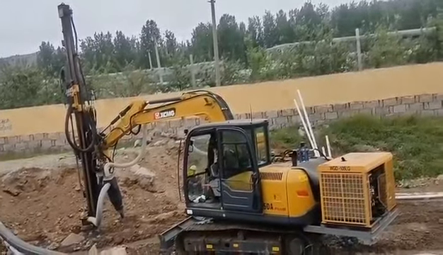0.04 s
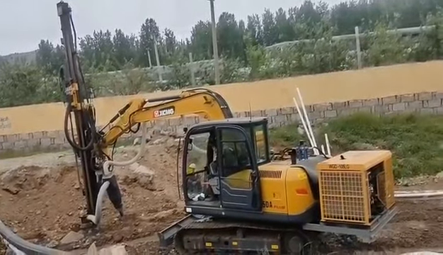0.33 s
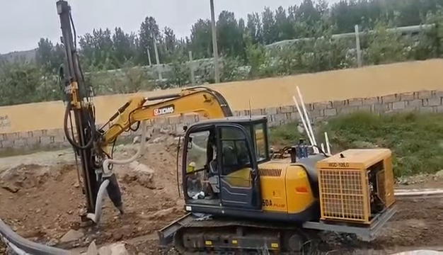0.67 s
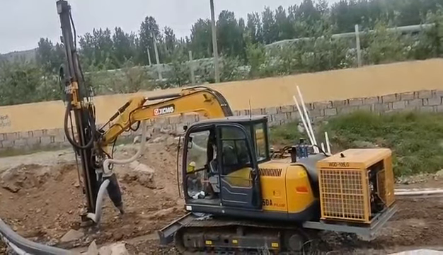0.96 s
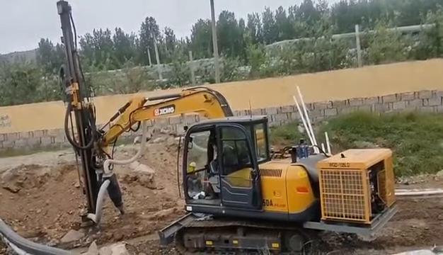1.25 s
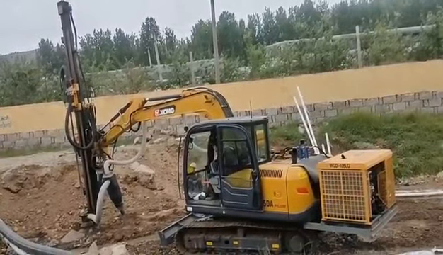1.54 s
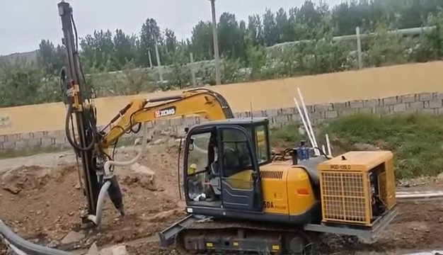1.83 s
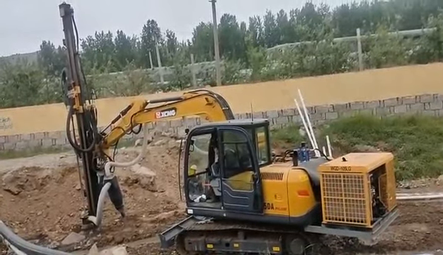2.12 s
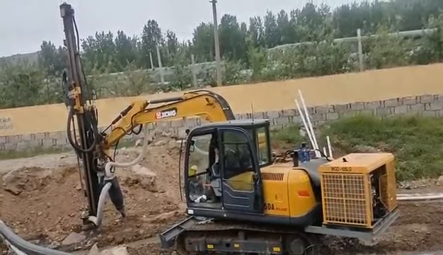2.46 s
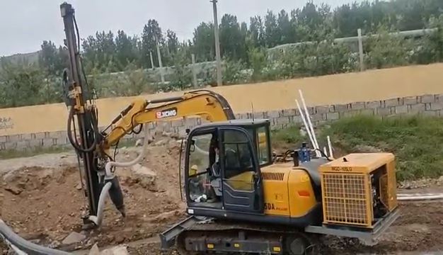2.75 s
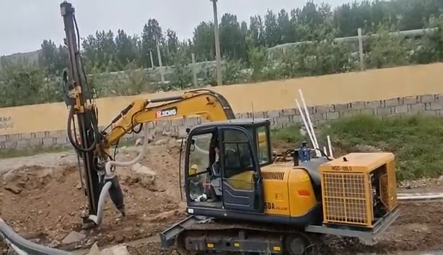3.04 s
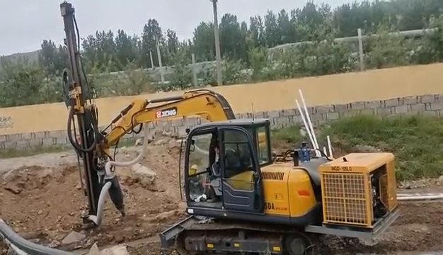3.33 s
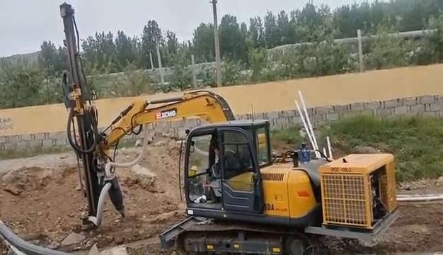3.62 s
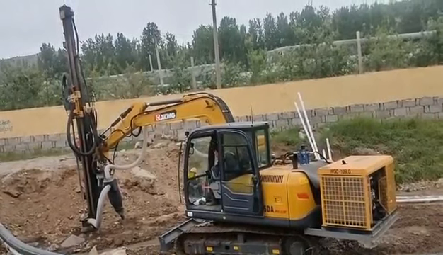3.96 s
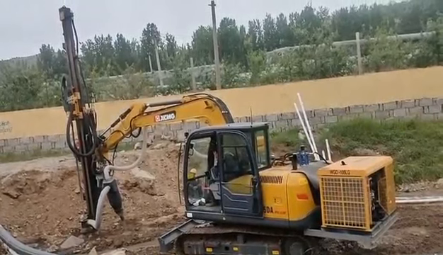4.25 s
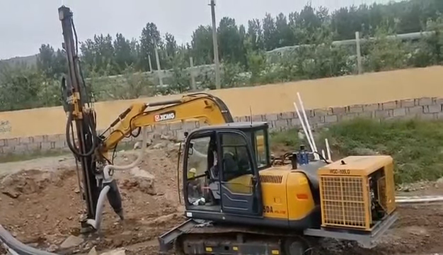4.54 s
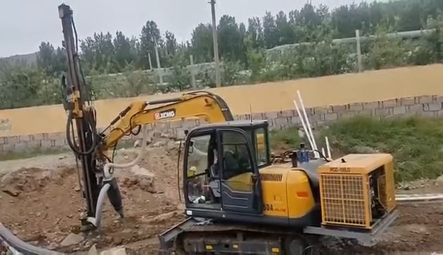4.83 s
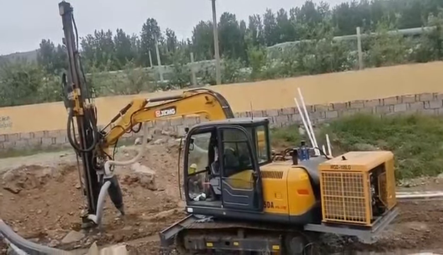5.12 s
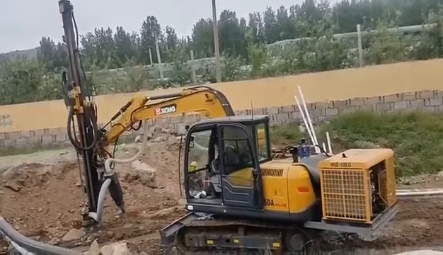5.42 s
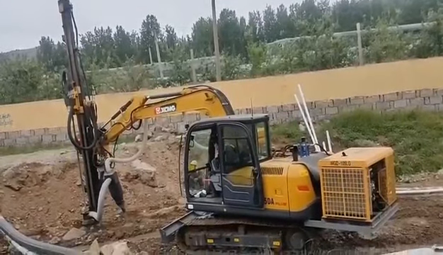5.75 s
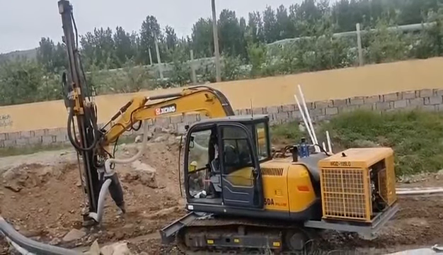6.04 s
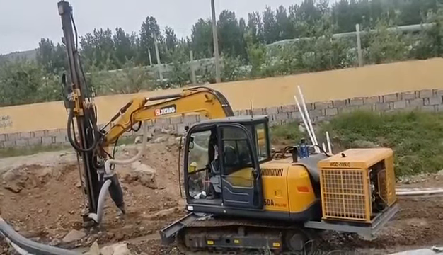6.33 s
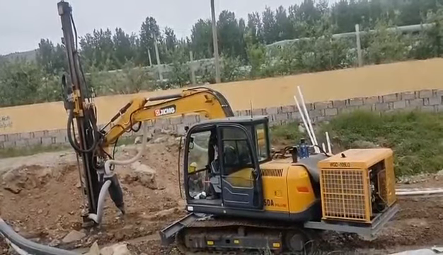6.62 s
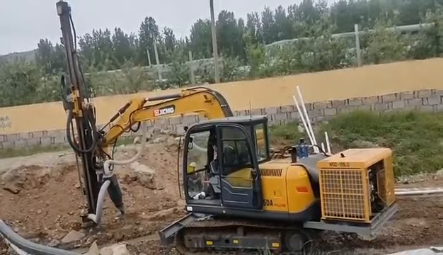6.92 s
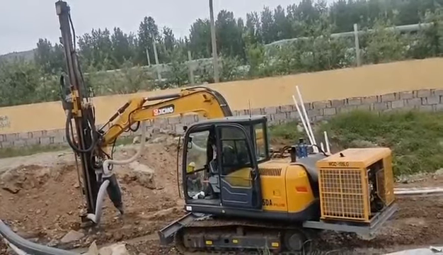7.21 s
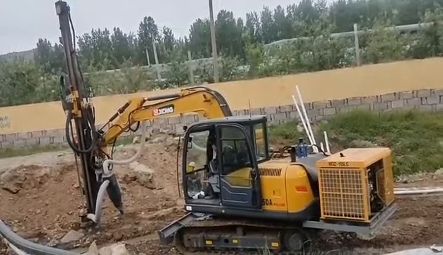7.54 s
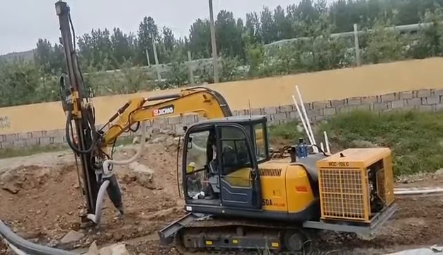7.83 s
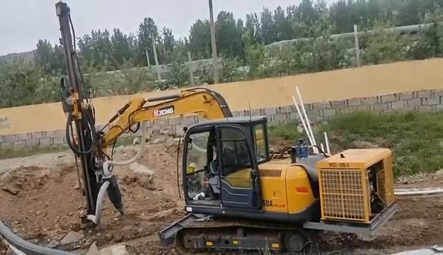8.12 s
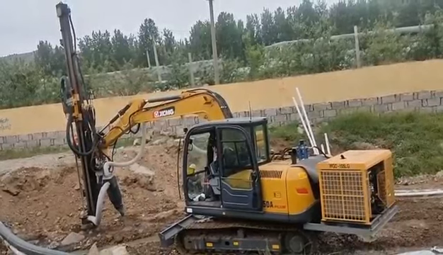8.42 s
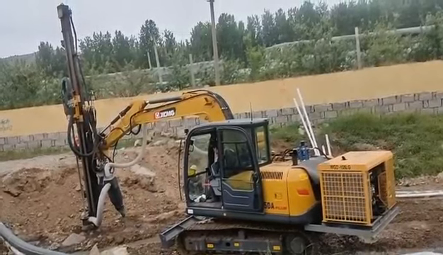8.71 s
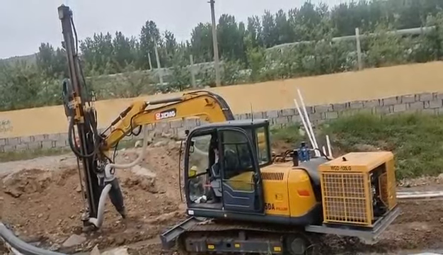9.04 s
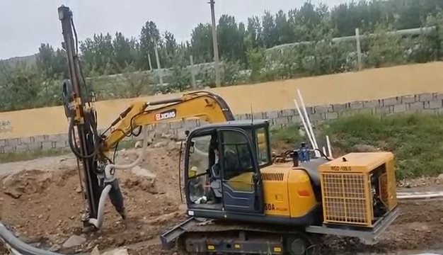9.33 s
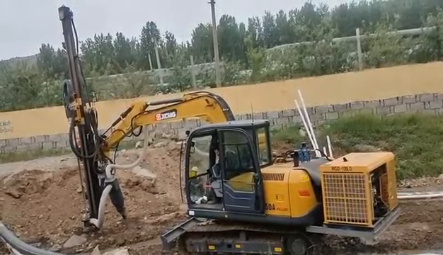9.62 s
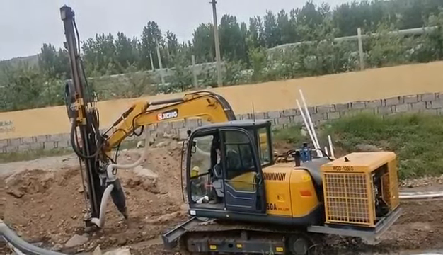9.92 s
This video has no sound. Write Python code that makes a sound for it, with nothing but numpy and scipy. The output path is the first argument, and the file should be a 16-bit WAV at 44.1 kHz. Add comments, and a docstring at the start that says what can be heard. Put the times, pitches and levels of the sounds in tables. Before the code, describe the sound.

A rock drill hammers rapidly with ringing steel and hissing air over the steady drone of a diesel engine.

```python
"""Open worksite: an excavator-mounted rock drill bores into stony ground. The hammer strikes about 26 times a
second, ringing the drill steel and rattling chuck and mast; flushing air hisses at the hole. A four-cylinder
diesel drives the compressor under load, with fan whine and buzzing covers; a second engine idles beside it, its
hydraulic pump whining at a steady pitch. Loose stones rasp under the bit, the steel sings in soft patches, and
the bit bites hard on solid rock."""
import sys
import numpy as np
from scipy import signal
from scipy.fft import rfft, irfft, next_fast_len
from scipy.io import wavfile
from scipy.ndimage import uniform_filter1d

SR = 44100
rng = np.random.default_rng(int(sys.argv[2]) if len(sys.argv) > 2 else 0)


def master_out(mix):
    """Clip the mix to full scale and print it as 16-bit PCM to the path in sys.argv[1]."""
    frames = np.transpose(np.atleast_2d(mix))
    ceiling = np.clip(frames, -1, 1)
    pcm = np.round(ceiling * 32767).astype(np.int16)
    wavfile.write(sys.argv[1], SR, pcm)


N = 439677
TIME_S = np.arange(N) / SR


def from_db(db):
    """Decibels to gain."""
    return 10 ** (np.asarray(db) / 20)


def unit_rms(x):
    """Scale to rms 1."""
    return x / np.sqrt(np.mean(x ** 2) + 1e-20)


def curves(rows):
    """Columns after time_s, interpolated to every sample."""
    time_s, *columns = np.transpose(rows)
    return [np.interp(TIME_S, time_s, column) for column in columns]


def drift(rate_hz):
    """Random wander through unit-normal points."""
    return np.interp(TIME_S * rate_hz, np.arange(4000), rng.standard_normal(4000))


def swell(centre_s, sigma_s):
    """Gaussian rise and fall, height 1."""
    return np.exp(-.5 * ((TIME_S - centre_s) / sigma_s) ** 2)


def coloured(x, spectrum):
    """Filter by a smooth spectrum; rms 1."""
    freq_hz, density_db = np.transpose(spectrum)
    size = next_fast_len(N + SR // 10)
    grid_hz = np.maximum(np.arange(size // 2 + 1) * SR / size, 1)
    gain = from_db(np.interp(np.log(grid_hz), np.log(freq_hz), density_db))
    return unit_rms(irfft(rfft(x, size) * gain, size)[:N])


def resonance(x, freq_hz, width_hz):
    """Two-pole resonator, peak gain 1."""
    radius = np.exp(-np.pi * width_hz / SR)
    feedback = [1, -2 * radius * np.cos(2 * np.pi * freq_hz / SR), radius ** 2]
    return signal.lfilter(np.array([1, 0, -1]) * (1 - radius ** 2) / 2, feedback, x + 1e-18)


def band(x, freq_hz, width_hz):
    """Two resonators in series; rms 1."""
    return unit_rms(resonance(resonance(x, freq_hz, width_hz), freq_hz, width_hz))


# Tight patches: centre_s, sigma_s, lost_hz
BINDS = [(6.62, .06, 1.44), (7.2, .1, 1.12)]

def binding_hz():
    """Blow rate lost while the rod binds."""
    return sum(lost_hz * swell(centre_s, sigma_s) for centre_s, sigma_s, lost_hz in BINDS)


# Hammer pace in even rock: time_s, rate_hz
HAMMER_PACE = [(0, 26.259), (2.2, 26.105), (3.6, 25.898), (6.2, 26.164), (7.6, 25.996), (10, 26.118)]
# Soft patches, rod running free: centre_s, sigma_s, extra_hz, singing_db
SOFT_PATCHES = [(1.3, .1, 1.02, -32), (1.94, .05, .5, -31), (2.7, .07, .79, -32.5), (5.55, .07, .09, -33),
                (8.97, .08, 1.09, -32), (9.77, .08, .82, -37)]

def blow_count():
    """Blows so far; the hammer hurries in soft patches and labours in tight ones."""
    hurry_hz = sum(extra_hz * swell(centre_s, sigma_s) for centre_s, sigma_s, extra_hz, _ in SOFT_PATCHES)
    return np.cumsum(curves(HAMMER_PACE)[0] + hurry_hz - binding_hz()) / SR


def chatter(jitter_s, uneven_db, rise_s, hold_s, fall_s, memory):
    """Each piston blow starts a burst of chatter that partly repeats the one before."""
    blows, lead_blows = blow_count(), .16
    starts_s = np.interp(np.arange(int(blows[-1]) + 1) - lead_blows, blows, TIME_S, right=TIME_S[-1])
    age_s = np.arange(SR // 14) / SR
    envelope = np.minimum(age_s / rise_s, 1) * np.exp(-np.maximum(age_s - hold_s, 0) / fall_s)
    pattern = rng.standard_normal(len(age_s))
    out = np.zeros(N + SR)
    for start_s in starts_s:
        late, force = rng.standard_normal(2)
        pattern = memory * pattern + np.sqrt(1 - memory ** 2) * rng.standard_normal(len(age_s))
        at = max(int((start_s + jitter_s * late) * SR), 0)
        out[at:at + len(age_s)] += from_db(uneven_db * force) * envelope * pattern
    return unit_rms(out[:N])


def evened(x):
    """The piston delivers nearly equal energy over every three blows."""
    return x / np.sqrt(uniform_filter1d(x ** 2, size=5088) + 1e-12)


# Course of the drilling: time_s, steel_db, air_db
DRILLING_LEVELS = [(0, -29.5, -33), (1, -29.5, -33.5), (2.3, -31.5, -34.5), (3.6, -32, -32),
                   (5, -30.5, -34.5), (6.3, -32, -36), (8, -30.5, -36.5), (9, -31, -35.5),
                   (10, -31.5, -33.5)]
# Drill steel modes: pitch_hz, width_hz, level_db, sink_change_db
STEEL_MODES = [(1608, 67, -14.5, 2.5), (2657, 50, -13, -7.5), (3634, 39, -5.5, 3), (4030, 58, -11, 2.5),
               (4340, 82, -17.5, 3), (5145, 45, 0, -6), (5330, 250, -5, -8.5), (5470, 55, -1, -6.5),
               (5647, 100, -2, 3), (5752, 45, 2.5, 2), (6000, 45, 0.5, -3), (6230, 32, 1.5, -1.5),
               (6570, 50, -7.5, 1), (6778, 35, -1.5, -4), (7370, 34, -1.5, -2)]
# Loose chuck and mast: freq_hz, density_db
RATTLE_SPECTRUM = [(700, -27.5), (1400, -3), (2100, -4.5), (3000, -2), (4700, -6.5), (5500, -4), (6500, -6),
                   (7500, -2.5), (8000, -10)]

def drill(ring_gain_db, rattle_db, turning_db):
    """Blows rattle the mast and ring the steel, whose modes trade strength as it turns and sinks."""
    rock_rate_hz, rock_swing_db, bind_db_per_hz = 7, 0.5, 0.5
    steel_db = curves(DRILLING_LEVELS)[0] + rock_swing_db * drift(rock_rate_hz)
    steel_db += ring_gain_db - bind_db_per_hz * binding_hz()
    mast_db = rattle_db + rock_swing_db * drift(rock_rate_hz)
    chuck = chatter(jitter_s=.0001, uneven_db=.04, rise_s=.0035, hold_s=.0089, fall_s=.01, memory=.51)
    mast = chatter(jitter_s=.0005, uneven_db=3.5, rise_s=.0047, hold_s=.0062, fall_s=.031, memory=.13)
    depth = TIME_S / TIME_S[-1] - .5
    delays = rng.integers(0, SR // 600, len(STEEL_MODES))  # wave travel along the rod
    ring = 0
    for delay, (pitch_hz, width_hz, level_db, sink_change_db) in zip(delays, STEEL_MODES):
        gain = from_db(level_db + sink_change_db * depth + turning_db * drift(6))
        ring += gain * resonance(np.roll(chuck, delay), pitch_hz, width_hz)
    return from_db(steel_db) * evened(ring) + from_db(mast_db) * coloured(mast, RATTLE_SPECTRUM)


# Air hiss: freq_hz, density_db
AIR_SPECTRUM = [(1500, -13), (2300, -9), (3100, -2.5), (4700, 2.5), (5700, 12.5), (6500, 4.5), (7600, 4.5),
                (8000, -14.5)]
# Dust hose and hood: pitch_hz, width_hz, gain_db
HOSE_MODES = [(3175, 120, 2.5), (3840, 64, 5), (4270, 92, 3), (7110, 130, 4)]

def flushing_air(gain_db, flutter_db, surge_db, puff_db):
    """Air carries grit out through the dust hose, with a puff of chips after each blow."""
    flow_db = curves(DRILLING_LEVELS)[1] + surge_db * drift(5)
    flow_db += puff_db * np.cos(2 * np.pi * (blow_count() - .1))
    hiss = coloured(grains(rate_hz=12000, spread_db=5.0), AIR_SPECTRUM)
    hose = sum(from_db(db) * resonance(hiss, pitch_hz, width_hz) for pitch_hz, width_hz, db in HOSE_MODES)
    return from_db(flow_db + gain_db + flutter_db * drift(20)) * unit_rms(hiss + hose)


def grains(rate_hz, spread_db):
    """Tiny random contacts of uneven size; rms 1."""
    sizes = from_db(spread_db * np.minimum(rng.exponential(1, N), 4)) * rng.choice([-1, 1], N)
    return unit_rms(sizes * (rng.random(N) < rate_hz / SR))


# Compressor diesel, one slow governor surge: time_s, firing_hz
DIESEL_SPEED = [(0, 78.423), (0.5, 77.628), (1.6, 77.811), (2.7, 78.512), (3.5, 79.327), (4.6, 79.485),
                (6.5, 78.596), (7.7, 78.503), (8.9, 77.519), (10, 78.169)]

def firing_count():
    """Diesel firings so far."""
    return np.cumsum(curves(DIESEL_SPEED)[0]) / SR


def diesel(cruise_hz, casing_gain_db, boom_gain_db, boom_hz, boom_width_hz):
    """Exhaust note, knocking casing, and the silencer booming with uneven gas flow."""
    surge_hz = curves(DIESEL_SPEED)[0] - cruise_hz
    firings = firing_count() + .82
    boom = from_db(boom_gain_db) * band(rng.standard_normal(N), boom_hz, boom_width_hz)
    clatter = from_db(casing_gain_db) * casing(firings, knock_db=-2.0, repeat_db=-7.5, fall_cycles=0.49)
    body_db = -29 - 0.07 * TIME_S
    return exhaust(firings, surge_hz, waver_db=0.3) + from_db(body_db) * (clatter + boom)


# Exhaust partials: firing_order, level_db
EXHAUST_PARTIALS = [(1, 0), (1.25, -31.5), (1.75, -25), (2.5, -28), (2.749, -28.5), (3, -19), (3.5, -29.5),
                    (4, -31), (5, -33), (5.5, -28.5), (7, -26.5), (10, -29.5)]

def exhaust(firings, surge_hz, waver_db):
    """One pressure pulse per firing, louder and rounder as the diesel speeds up."""
    note_db = -16 + 1.0 * surge_hz
    second_db = -8.5 - 1.7 * surge_hz
    note = from_db(second_db) * np.cos(4 * np.pi * firings)
    for order, level_db in EXHAUST_PARTIALS:
        gain = from_db(level_db + waver_db * min(order - .75, 2) * drift(23))
        note += gain * np.cos(2 * np.pi * order * firings)
    return -from_db(note_db) * note


# Casing under combustion knock: freq_hz, density_db
CASING_SPECTRUM = [(150, -12), (280, -10.5), (340, -4.5), (400, -1.5), (480, 3.5), (600, 1.5), (690, -1),
                   (900, -8), (1170, -8.5), (1350, -13.5), (2050, -21.5), (3000, -20), (7000, -38.5)]

def casing(firings, knock_db, repeat_db, fall_cycles):
    """Each cylinder knocks with its own strength; part of the clatter repeats every four firings."""
    cylinder_db = np.array([-0.56, 0.19, -1.0, 1.4])
    knocks = firings + .4
    envelope = from_db(knock_db + cylinder_db[knocks.astype(int) % 4]) * np.exp(-(knocks % 1) / fall_cycles)
    period = int(4 * N / firings[-1])
    repeating = np.interp(firings / 4 % 1 * period, np.arange(period), rng.standard_normal(period))
    clatter = rng.standard_normal(N) + from_db(repeat_db) * repeating
    return coloured((1 + envelope) * clatter, CASING_SPECTRUM)


# Idle partials: firing_order, level_db
IDLE_PARTIALS = [(1, -38), (2, -36.5), (3, -47)]
# Ground-borne rumble: freq_hz, density_db
RUMBLE_SPECTRUM = [(12, -12.5), (25, -4), (50, 0), (100, 3), (140, 1.5), (190, -1.5), (300, -11.5),
                   (600, -35)]

def idling_engine(firing_hz, rumble_db, waver_db):
    """The excavator's own engine ticks over above a low rumble."""
    firings = firing_hz * TIME_S + 0.044 * drift(2.0)
    hum = sum(from_db(level_db + waver_db * drift(5.4)) * np.sin(2 * np.pi * order * firings)
              for order, level_db in IDLE_PARTIALS)
    return hum + from_db(rumble_db) * coloured(rng.standard_normal(N), RUMBLE_SPECTRUM)


# Cooling fan and compressor rotors: firing_order
ROTOR_ORDERS = [4.365, 8.73, 10.61, 13.09]
# Rotor tones: level_db
ROTOR_LEVELS_DB = [-48, -41.5, -53, -58.5]
# Hydraulic pump: pitch_hz, level_db
PUMP_TONES = [(481, -38.5), (841, -50), (1443, -56)]

def fan_and_pump(wander_cycles, waver_db):
    """Fan tones follow the diesel with slight belt slip; the pump holds its own pitch."""
    firings = firing_count()
    fan = [(order * firings, level_db) for order, level_db in zip(ROTOR_ORDERS, ROTOR_LEVELS_DB)]
    pump = [(pitch_hz * TIME_S, level_db) for pitch_hz, level_db in PUMP_TONES]
    out = 0
    for cycles, level_db in fan + pump:
        gain = from_db(level_db + waver_db * drift(5))
        out += gain * np.sin(2 * np.pi * (cycles + wander_cycles * drift(4)))
    return out


def covers(level_db, shake_db, centre_hz, width_hz, fall_cycles):
    """Loose sheet covers buzz unevenly with the firings."""
    age_cycles = (firing_count() + .9) % 1
    knocks = np.exp(-age_cycles / fall_cycles) * from_db(shake_db * np.tanh(drift(25)))
    return from_db(level_db) * band(knocks * rng.standard_normal(N), centre_hz, width_hz)


# Loose stones under the bit: centre_s, sigma_s, level_db, centre_hz, width_hz
STONE_RASPS = [(0.38, 0.03, -32, 4030, 2200), (0.736, 0.03, -33, 4070, 1900),
               (1.027, 0.035, -32, 4170, 1900), (4.257, 0.037, -28.5, 7200, 700),
               (9.15, 0.061, -37, 3820, 1600)]

def stone_rasps(gain_db):
    """Each stone is ground away in a short swell of grit."""
    grit = grains(rate_hz=4000, spread_db=3.5)
    return sum(from_db(level_db + gain_db) * swell(centre_s, sigma_s) * band(grit, centre_hz, width_hz)
               for centre_s, sigma_s, level_db, centre_hz, width_hz in STONE_RASPS)


def singing_steel(gain_db, pitch_hz, width_hz):
    """Less damped in soft patches, the steel's main mode swells, renewed by each blow."""
    freedom = sum(from_db(db) * swell(centre_s, sigma_s) for centre_s, sigma_s, _, db in SOFT_PATCHES)
    kicks = np.exp(-4 * ((blow_count() + .1) % 1)) * rng.standard_normal(N)
    return from_db(gain_db) * freedom * evened(resonance(kicks, pitch_hz, width_hz))


# Hard bites: start_s, level_db
HARD_BITES = [(3.543, -12), (4.549, -12), (6.460, -17), (8.325, -7.5), (8.514, -10)]

def bit_bites(gain_db, fall_s, pitch_hz, width_hz):
    """Short, hard contacts ring the steel where the bit meets solid rock."""
    hits = np.zeros(N)
    for start_s, level_db in HARD_BITES:
        hits[int(start_s * SR)] = from_db(level_db + gain_db)
    envelope = signal.lfilter([1], [1, -np.exp(-1 / (fall_s * SR))], hits + 1e-18)
    return envelope * band(rng.standard_normal(N), pitch_hz, width_hz)


def scene():
    """Drill and engines in open air, mono."""
    mix = drill(ring_gain_db=0.5, rattle_db=-39.0, turning_db=2.5)
    mix += flushing_air(gain_db=2.5, flutter_db=1.0, surge_db=0.66, puff_db=0.5)
    mix += diesel(cruise_hz=78, casing_gain_db=0.1, boom_gain_db=-2.5, boom_hz=231.4, boom_width_hz=47.4)
    mix += idling_engine(firing_hz=43.4, rumble_db=-34.0, waver_db=2.5)
    mix += fan_and_pump(wander_cycles=.15, waver_db=3.5)
    mix += covers(level_db=-44.0, shake_db=11.0, centre_hz=1110, width_hz=490, fall_cycles=0.46)
    mix += stone_rasps(gain_db=-1.5)
    mix += singing_steel(gain_db=1.0, pitch_hz=5720, width_hz=15)
    mix += bit_bites(gain_db=-8.0, fall_s=0.0056, pitch_hz=5660, width_hz=580)
    return mix[None]


def record(dry):
    """Steep low-pass."""
    cutoff_hz = 7950
    return signal.sosfilt(signal.ellip(14, .2, 90, cutoff_hz, fs=SR, output="sos"), dry)


dry = scene()
out = record(dry)
master_out(out)
```